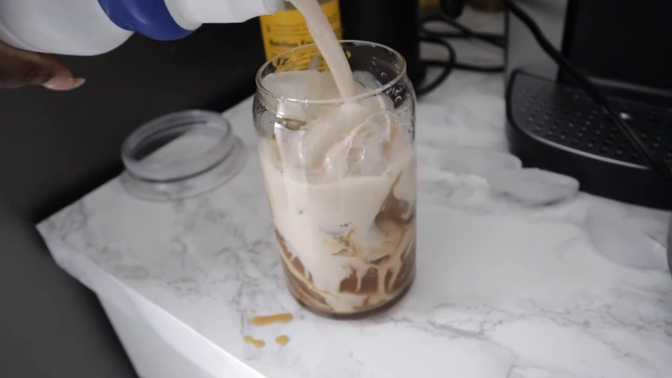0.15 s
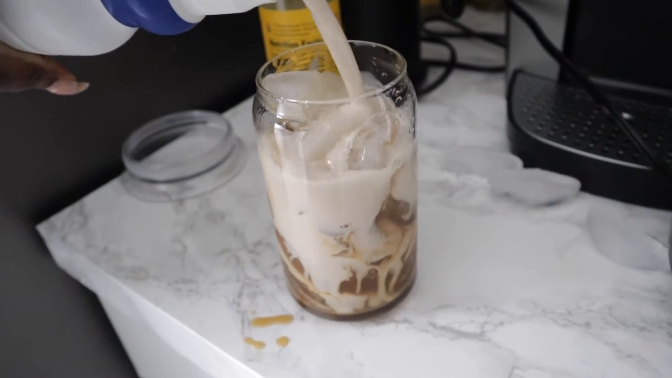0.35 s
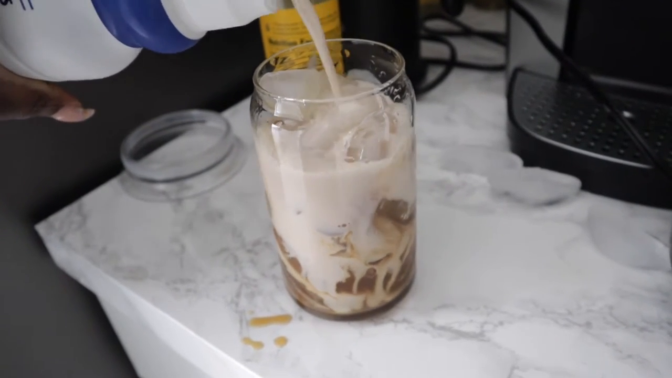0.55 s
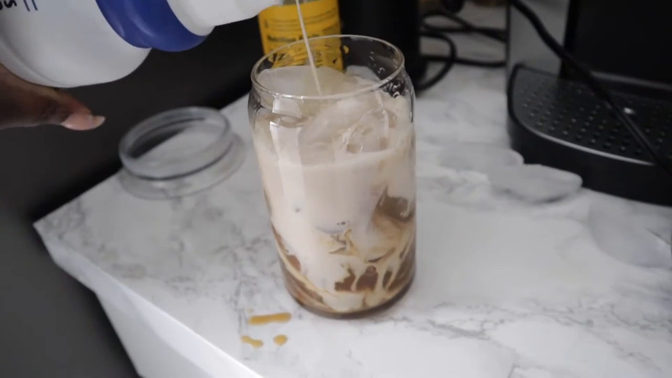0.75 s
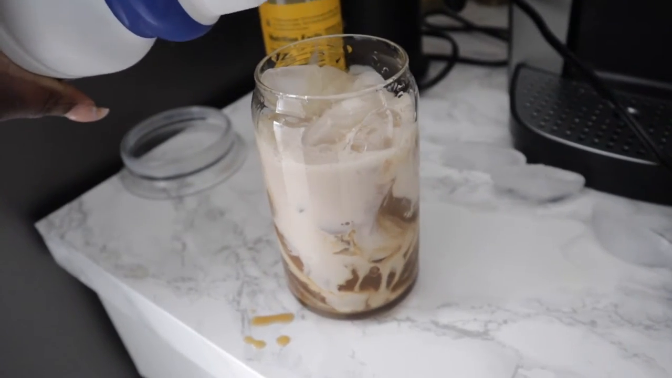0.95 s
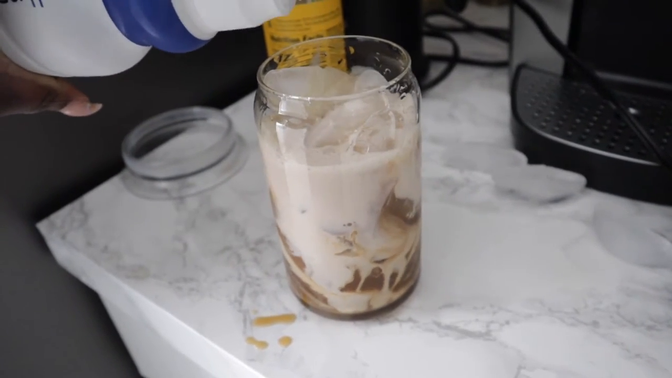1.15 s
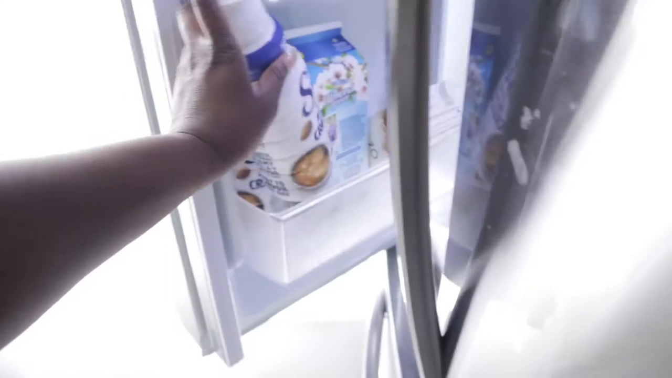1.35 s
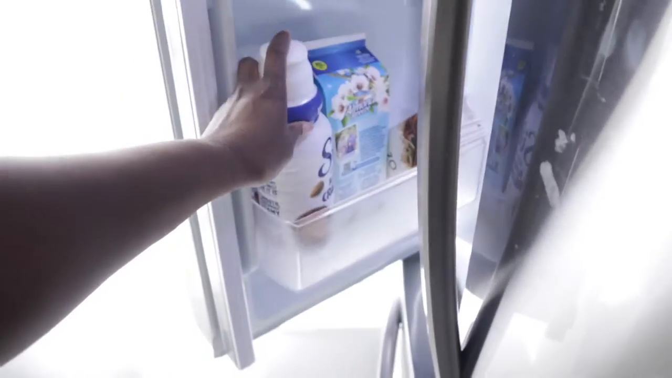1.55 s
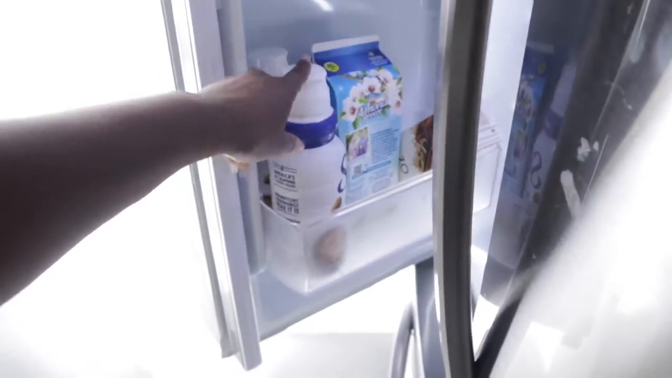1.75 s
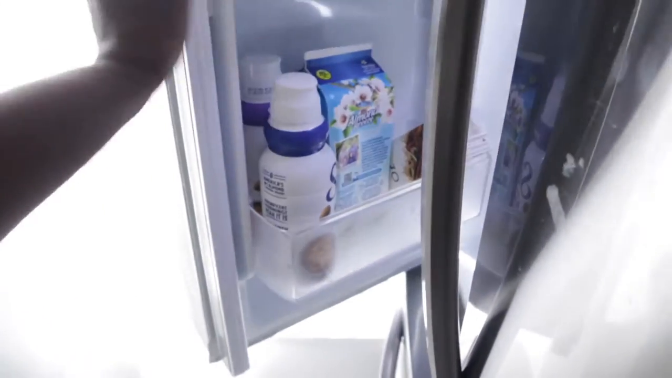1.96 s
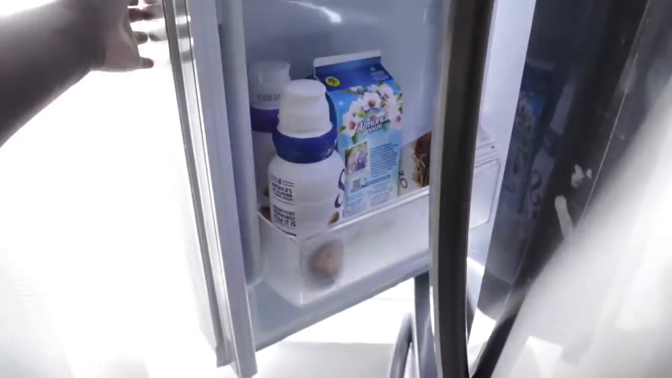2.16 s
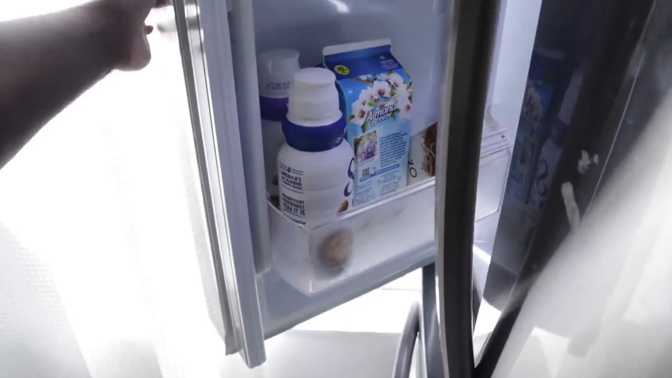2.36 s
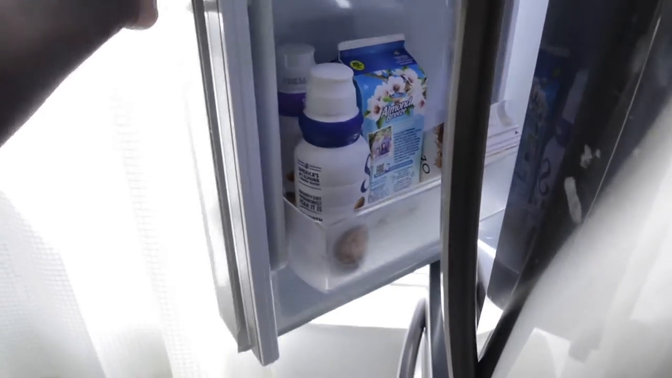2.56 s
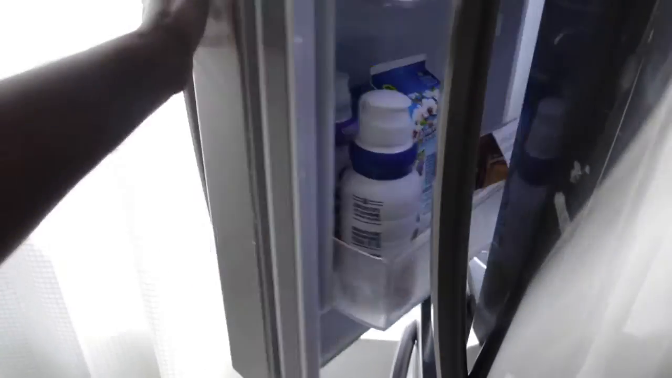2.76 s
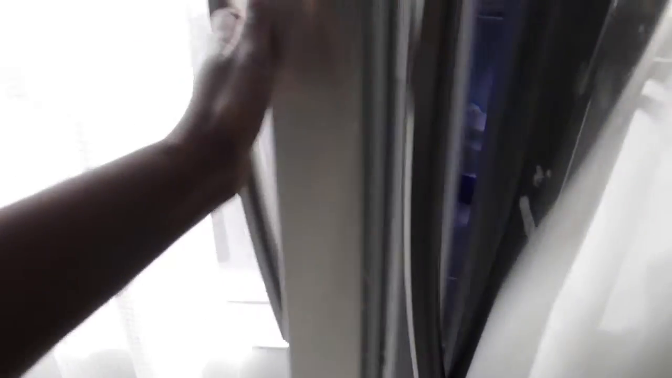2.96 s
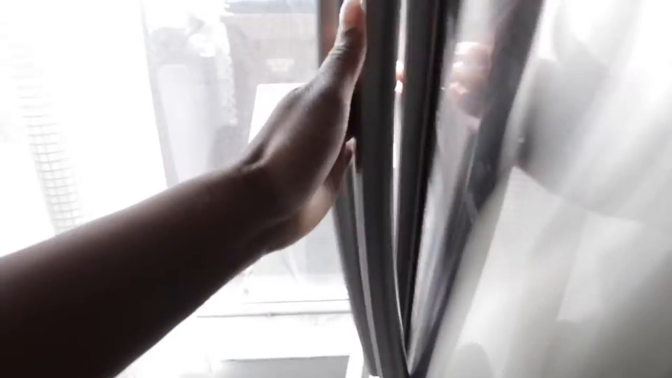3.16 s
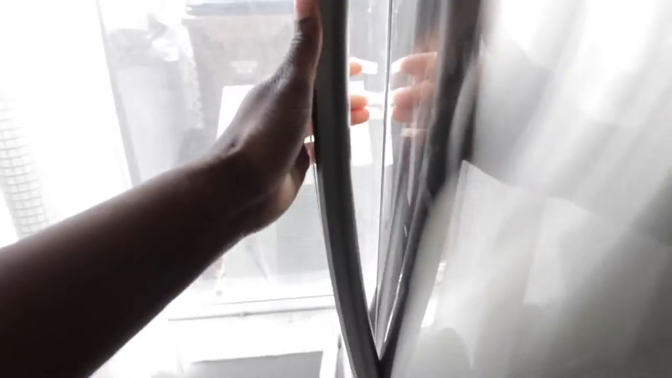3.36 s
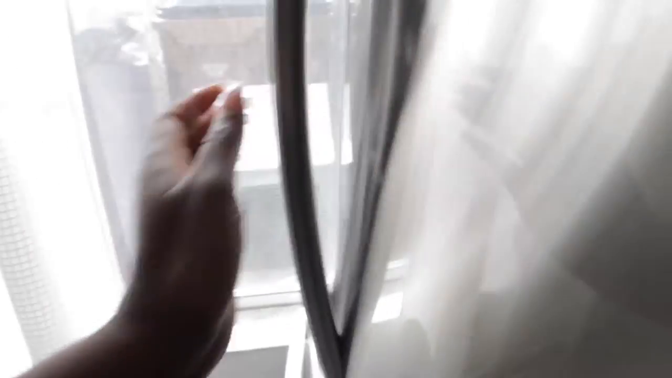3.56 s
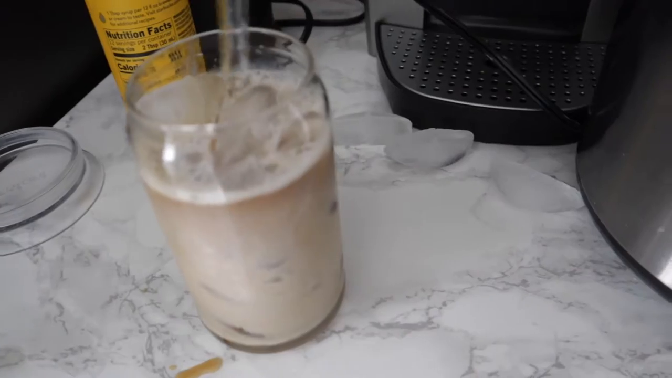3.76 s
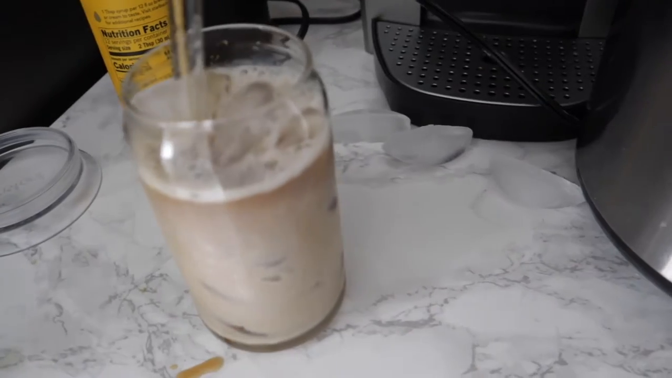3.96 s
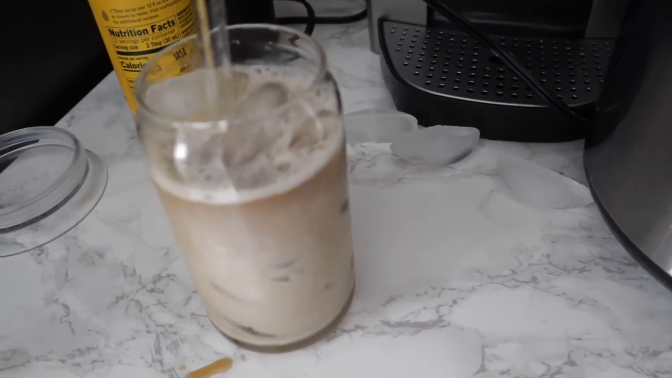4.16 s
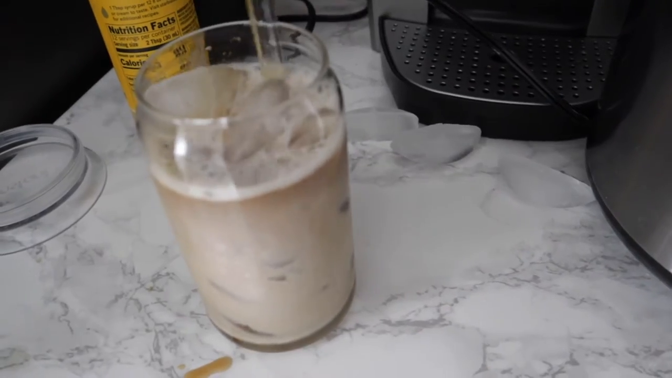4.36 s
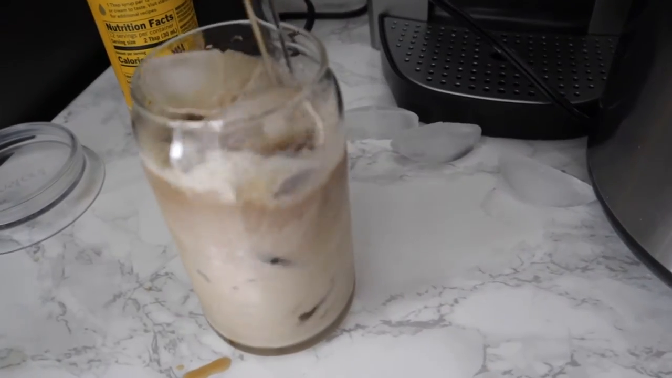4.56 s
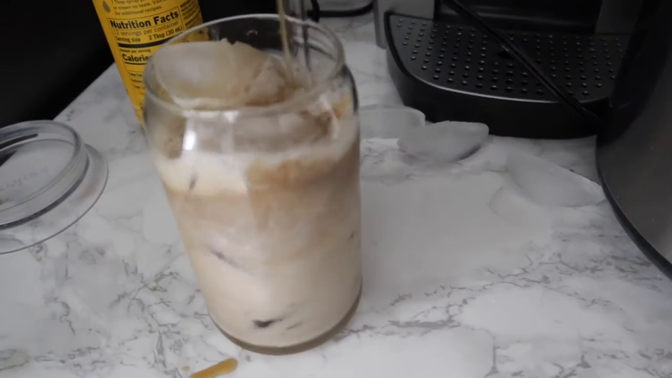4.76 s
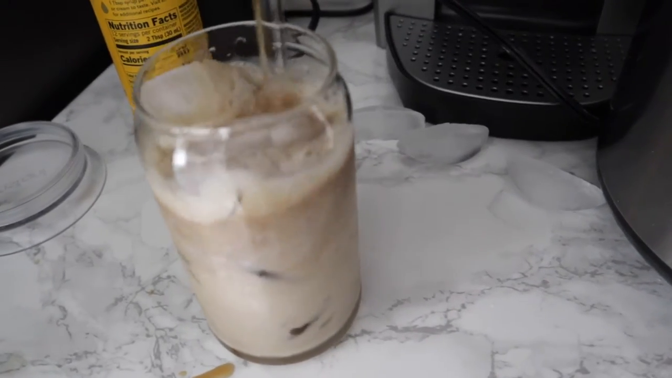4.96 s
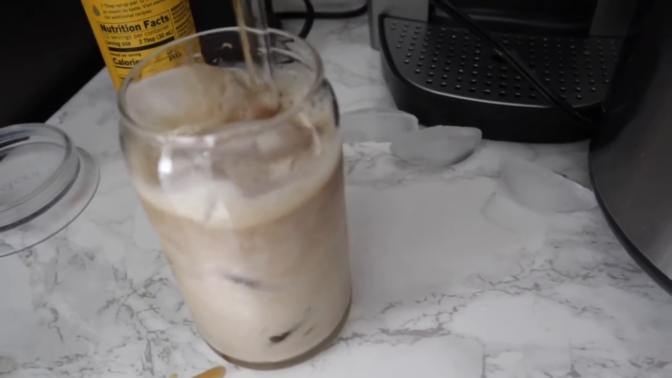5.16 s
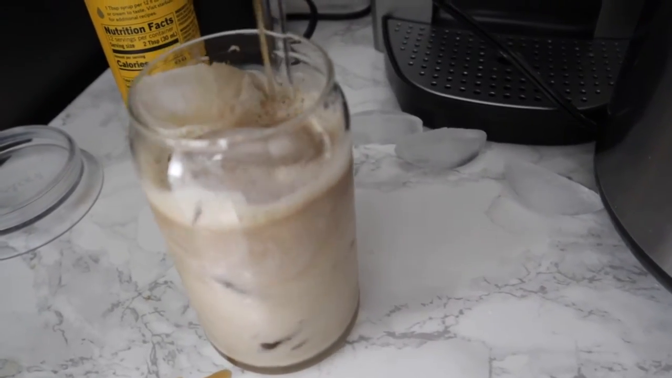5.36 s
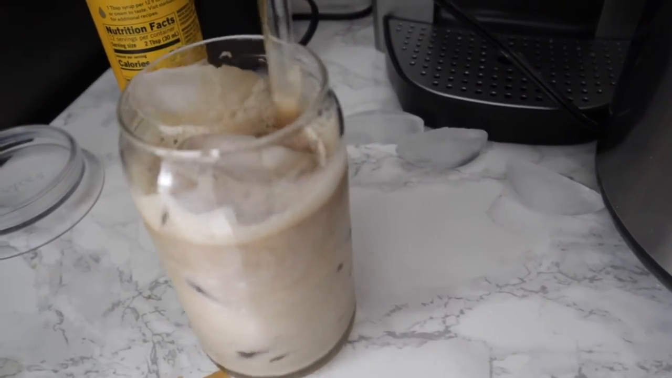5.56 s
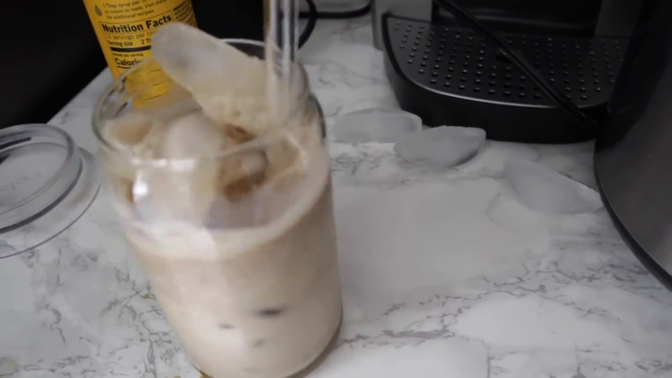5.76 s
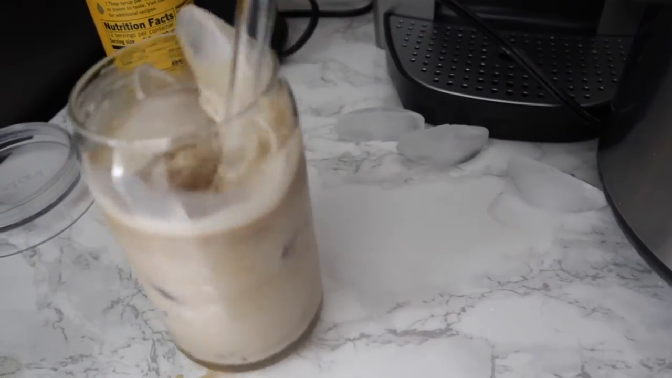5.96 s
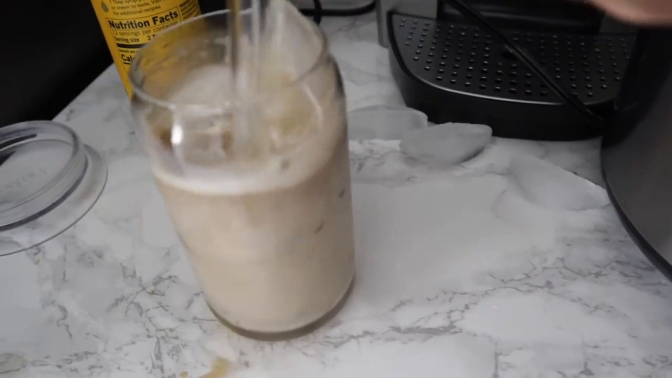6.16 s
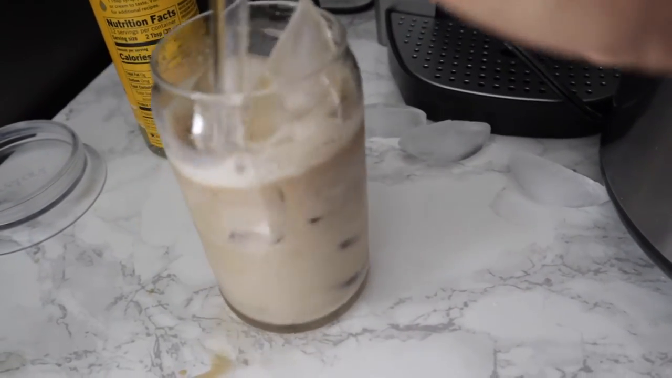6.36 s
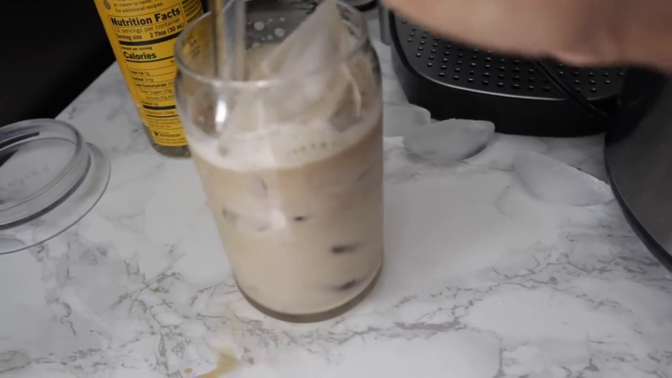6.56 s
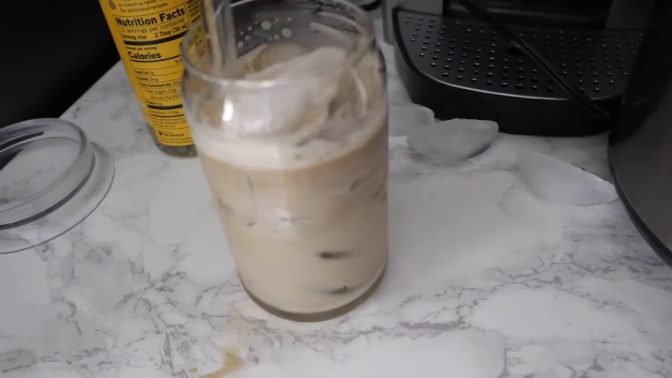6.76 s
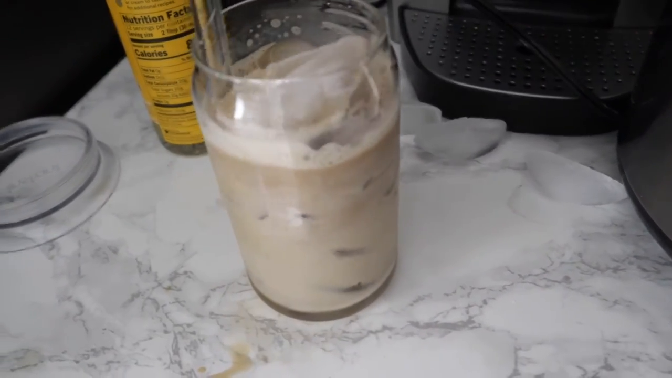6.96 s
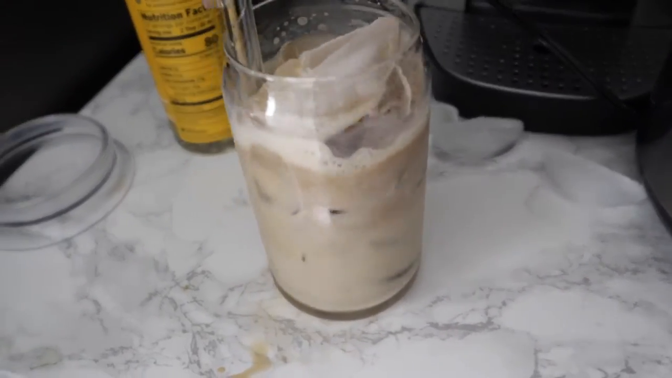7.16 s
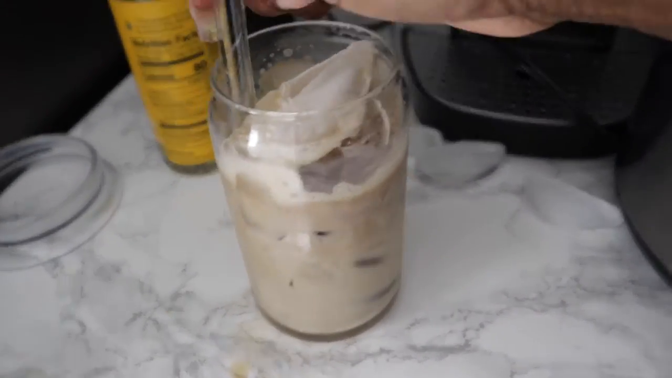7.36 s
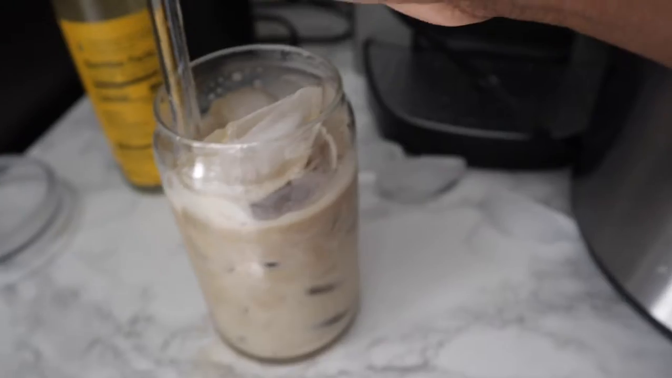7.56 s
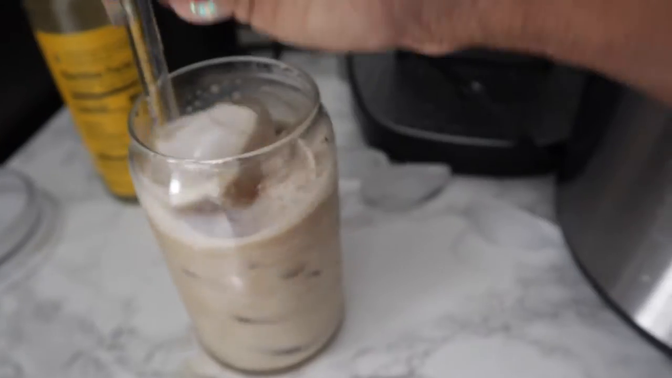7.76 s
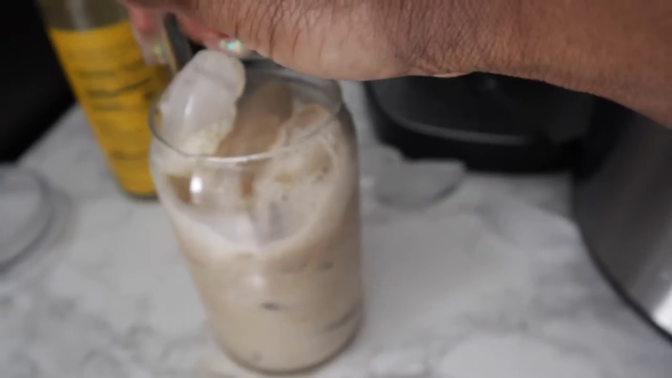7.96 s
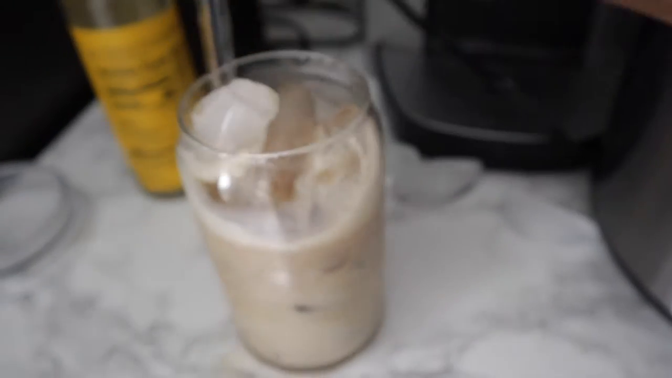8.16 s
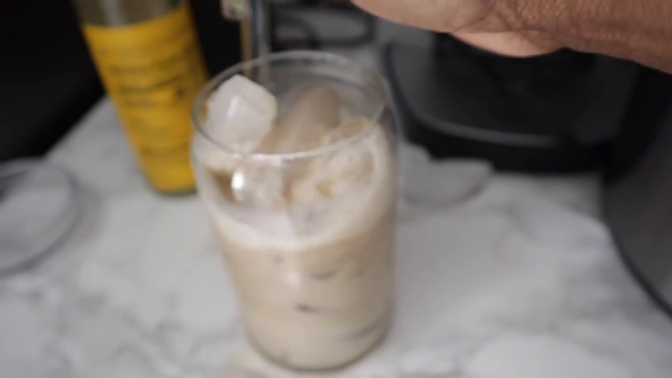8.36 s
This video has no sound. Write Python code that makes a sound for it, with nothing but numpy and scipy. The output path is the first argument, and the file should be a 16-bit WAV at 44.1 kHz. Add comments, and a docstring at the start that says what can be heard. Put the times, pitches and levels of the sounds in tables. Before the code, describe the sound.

In a small kitchen, close to the microphone, creamer crackles faintly over ice with a few ticking drops. A bottle then drops loudly into a fridge door shelf, hollow plastic booming and clacking over a faint motor hum. A snap and the door's heavy, rattling closing thumps follow. Finally a straw stirs iced coffee: wet ice clicks, grainy rubbing, tiny bubble plips and low knocks of the glass jar on the counter.

```python
"""A straw stirs iced coffee in a glass jar: cubes click as short clusters of struck notes plus noise, rub as
grainy noise and drip as rising bubble notes, while the jar knocks on the counter with its low notes.
Before that, creamer runs softly onto ice (crackling noise, ticking drops), and its bottle is dropped into
the fridge door shelf and the door is pushed shut (booms, clacks, cracks, snaps, thuds and shaking).
Air noise, a motor hum and the echo of a small kitchen surround it all."""
import sys
import numpy as np
from scipy import signal
from scipy.io import wavfile

SR = 44100
rng = np.random.default_rng(int(sys.argv[2]) if len(sys.argv) > 2 else 0)


def materialize(psi):
    """Save the field psi as 16-bit PCM at rate SR to the path in sys.argv[1].

    A 1-D psi becomes a single channel; in a 2-D psi each row is a channel.
    """
    bounded = np.clip(np.atleast_2d(psi).T, -1, 1)
    quanta = np.round(bounded * 32767).astype(np.int16)
    wavfile.write(sys.argv[1], SR, quanta)


N = 371322
TIME = np.arange(N) / SR   # seconds from the start
AGE = TIME[:SR // 3]   # seconds since a blow

# In all tables, t60 is the time a sound takes to fade by 60 dB. Levels are relative: gains may follow.

# Kitchen air and appliance hum, one colour for each of three places: f/Hz, level per Hz/dB
AIR_POUR = [(13, -35), (22, -9.5), (133, -4), (170, -14.5), (279, -6), (397, -14), (567, -15.5),
            (1010, -18), (1690, -28), (2160, -29), (5320, -33.5), (5930, -43), (10500, -41), (15000, -48)]
AIR_FRIDGE = [(13, -38), (22, -10), (86, -14), (224, -6.5), (286, -12.5), (356, -15), (431, -4.5),
              (468, -16), (668, -17.5), (1060, -22), (1150, -15), (1400, -25.5), (7380, -38),
              (10500, -40.5), (15000, -86.5)]
AIR_STIR = [(13, -31), (22, 1.5), (286, -2), (408, -11), (582, -9.5), (668, -9.5), (1030, -12.5),
            (1430, -26), (1600, -9.5), (1780, -21.5), (2610, -22.5), (7180, -34), (9960, -46.5),
            (15000, -62)]
AIR_POUR_DB, AIR_FRIDGE_DB, AIR_STIR_DB = -39, -42, -40
# Steady tones of the fridge motor: f/Hz, level/dB
MOTOR = [(226, -62), (366, -51), (425, -59)]
# How alike left and right are (1 same, -1 opposite): f/Hz, nearby sounds/share, kitchen air/share
LIKENESS = [(59.6, .999, 1), (132, 1, 0.99), (296, 1, 0.91), (640, 0.65, 0.39), (1320, 0.46, -0.24),
            (3070, -0.41, -0.49), (7350, -0.093, -1.01), (15500, -0.99, -0.5)]
# Echo of the kitchen: f/Hz, level/dB, t60/s
KITCHEN = [(100.5, -23, 0.87), (367, 9, 0.23), (1500, 7, 0.17), (5130, 0.5, 0.29), (9500, -13, 0.21),
           (14000, 18, 0.13)]
SOFT_TOP_HZ = 12400   # rubbing, shelf rattle, air and echoes are low-passed here
CUTOFF_HZ = 16000   # steep low-pass over the whole mix; almost nothing sounds above this

# Cream running over ice: t/s, level/dB
POUR = [(0.0, -51.5), (0.318, -50.5), (0.416, -44), (0.594, -46), (0.616, -54), (1.332, -54), (1.36, -50)]
# Colour of that crackle: f/Hz, level per Hz/dB
SPLASH = [(350, -42), (600, -15), (741, -7), (1110, -13.5), (1360, -14), (2880, -18.5), (3900, -24.5),
          (9940, -27), (14000, -15)]
# Heavy cream drops on ice: t/s, level/dB, f/Hz
DROPS = [(0.41, -26, 2790), (.447, -32, 2300), (0.563, -28, 2560)]
GLUG_START_S, GLUG_END_S = .39, .6
# Small drops of the glug: number, level of the largest, pitch range
SPRAY_COUNT, SPRAY_DB, SPRAY_LOW_HZ, SPRAY_HIGH_HZ = 70, -38, 1300, 5500

# Bottle, shelf and door blows:
# t/s, boom f/Hz, boom level/dB, clack f/Hz, clack level/dB, crack f/Hz, crack level/dB, treble level/dB
BLOWS = [(1.388, 181, -20, 610, -16.5, 2280, -14, -16), (1.406, 260, -17, 610, -10.5, 1530, -28, -36),
         (1.442, 202, -14, 578, -8, 1270, -25, -26), (1.463, 252, -7, 840, -16, 1260, -27, -26),
         (1.5, 180, -20, 497, -16, 1800, -21, -20), (1.522, 214, -0.5, 596, -2, 1994, -4.5, -8.5),
         (1.552, 170, -8.5, 585, -24, 1840, -15, -21), (1.584, 297, -6.5, 730, 0, 2080, -11.5, -11.5),
         (1.606, 218, -14, 636, -28, 2150, -30, -18), (1.641, 261, -15, 623, -25, 2100, -38, -36),
         (1.763, 163, 0, 695, -5.5, 1650, -9, -15.5), (1.795, 269, 0.5, 665, -2.5, 1580, -2.5, -4),
         (1.808, 271, -4, 700, -14.5, 1800, -13, -19.5), (1.849, 251, -4, 770, -6.5, 1470, -15.5, -15.0),
         (1.898, 220, -6.5, 835, -25, 1900, -29, -37), (1.933, 363.6, -12.5, 450, -27.5, 1320, -39, -25.5),
         (2.281, 363, -40, 800, -45, 2750, -31, -27.5), (2.606, 358, -37, 1107, -40, 1270, -31, -25.5),
         (3.101, 176, -18.5, 720, -17, 1580, -23, -19), (3.117, 243, -32, 740, -21.5, 1440, -19.5, -14),
         (3.203, 227, -14.5, 920, -21, 1590, -5.5, -16.5), (3.2232, 280, -0.5, 900, -5, 2090, -6, -6.5),
         (3.272, 275, -11, 900, -17, 1380, -17, -12), (3.283, 200, 2, 840, -6, 1900, -2.5, -7),
         (3.376, 150, -11, 950, -16, 1480, -21, -45), (3.386, 266, -9, 644, -16, 2300, -16, -19.5),
         (3.4535, 212, -4, 830, -14.5, 1230, -28, -50), (3.529, 198, -19, 750, -23.5, 1280, -43, -55),
         (3.597, 132, -13.5, 740, -28, 1910, -37, -63)]
# Boom, clack and crack ranges: low f/Hz, high f/Hz, gain/dB, rattle against note/dB, t60/s
FRIDGE_BANDS = [(125, 312, 0, -3, 0.06), (510, 1140, 0, 0.5, 0.038), (1253, 2800, 0.5, 3.5, 0.036)]
# Splintery treble of a blow: low f/Hz, high f/Hz, gain/dB, t60/s
SPLINTER_BANDS = [(3330, 5140, -2, 0.059), (5200, 17600, 0.5, 0.085)]
SHARP_DB, SHARP_T60_S = -8.5, 0.01   # first hard touch of a blow: level against its rattle, t60
# Small plastic snaps: t/s, level/dB
SNAPS = [(1.076, -36.5), (2.184, -7), (2.191, -7), (2.198, -6), (2.947, -39.5)]
# Soft heavy thuds of glugging cream, bottle and door: t/s, level/dB, f/Hz, t60/s
THUDS = [(0.48, -20.5, 136, 0.038), (0.531, -20.5, 117, 0.081), (1.621, -22, 59.4, 0.35),
         (1.769, -14, 143, 0.1), (3.059, -27, 45.8, 0.65), (3.177, -16, 55, 0.1), (3.286, -3.5, 63, 0.07),
         (3.353, -15, 42, 0.58), (3.42, -23, 36, .25)]
# Two spans of shelf contents shaking and the gasket rubbing: t/s, rumble level/dB, rattle level/dB
SHAKE = [
    [(1.36, -49, -73), (1.418, -34, -23.5), (1.592, -9.5, -23), (1.734, -33, -35), (1.772, -24, -21.5),
     (1.952, -23, -29.5), (2.1, -48, -52.5)],
    [(3.04, -34, -48), (3.126, -25.5, -27), (3.294, -16.5, -34.5), (3.326, -22.5, -22), (3.478, -13.5, -32),
     (3.64, -32, -47), (3.72, -41, -48)],
]
# Colours of that rumble and rattle: f/Hz, level per Hz/dB
RUMBLE = [(15, -30.5), (25, -16), (49, -4), (97, -4), (161, 0), (270, -2.5), (305, 18.5), (397, -19.5),
          (466, -36.5), (600, -42), (780, -65), (1320, -120)]
RATTLE = [(260, -26), (450, 5.5), (603, -13), (897, 1), (1100, -14), (1200, -11), (2430, -15),
          (4710, -28.5), (6990, -27.5), (8850, -30.5), (10900, -14), (15000, -45.5)]
# Notes of the plastic shelf, one for each small tap: f/Hz
SHELF_MODES_HZ = [595, 755, 1067, 1248, 1562, 2022]
# Cartons tapping in the shelf: taps per second, level against the rattle, length of a tap in cycles
CHATTER_PER_S, CHATTER_DB, CHATTER_CYCLES = 240, -7.5, 9

# The straw rocks the jar on the counter: t/s, low level/dB, middle level/dB, high level/dB
KNOCKS = [(3.975, -17, -21, -18.5), (4.566, -17.5, -23.5, -28), (4.596, -18, -20.5, -21),
          (4.648, -27, -40, -42), (4.7, -23, -41, -49), (4.782, -24, -30, -41), (4.984, -20, -12, -21),
          (4.993, -28, -19, -25), (5.255, -17.5, -25, -17), (5.437, -27, -29, -37),
          (5.649, -19.5, -31, -44), (5.683, -26, -26, -32), (5.72, -28, -27, -29), (6.058, -24.5, -33, -42),
          (6.088, -28.5, -23.5, -22.5), (6.166, -22.5, -26.5, -33), (6.37, -21, -19, -28),
          (6.399, -22, -21, -28), (6.468, -26, -30, -40), (6.553, -30, -16.5, -24), (6.893, -32, -32, -36),
          (7.002, -19, -21, -29), (7.036, -19.5, -20, -27.5), (7.164, -23, -24, -29),
          (7.2, -11, -13.5, -17), (7.213, -12, -18.5, -25), (7.282, -21, -26, -26), (7.55, -55, -20, -30),
          (7.78, -34, -26, -22.5), (7.833, -25, -18, -20.5), (7.848, -22, -22, -17), (7.984, -29, -35, -37)]
# Where those low, middle and high levels apply: f/Hz
KNOCK_HZ = [117, 370, 800]
# Notes of a knock on the counter: f/Hz, level/dB, t60/s
COUNTER = [(106.2, -2.5, 0.26), (136.2, -5.5, 0.29), (197.6, -5, 0.072), (272, 1, 0.047),
           (323.3, -2, 0.087), (374, -4, 0.082), (457, -6, 0.08), (584.6, -11.5, 0.065), (796, -6.5, 0.022),
           (1010, -7, 0.024)]
# The jar touches again after each knock: times, within how long, level against the knock
REBOUND_COUNT, REBOUND_S, REBOUND_DB = 2, 0.033, -10
# Every ice contact also jolts the jar; low, middle and high against the contact's low note: level/dB
ICE_PUSH_DB = [-18, -14.5, -13]

# Air pockets bursting under the moving cubes: t/s, level/dB, f/Hz
BUBBLES = [(4.612, -20, 1790), (4.809, -21, 2150), (5.691, -22, 1750), (5.739, -14.5, 1720),
           (5.774, -26, 1690), (5.847, -33, 1810), (6.04, -32, 1800), (6.183, -17, 1660),
           (6.675, -32, 1900), (7.605, -20.5, 1850), (7.676, -23.5, 1240), (7.979, -24.5, 1240),
           (8.001, -26, 1500), (8.007, -24, 1250), (8.103, -27, 1450), (8.121, -28, 1480),
           (8.271, -26, 1250)]
# Life of a bubble in cycles (to -60 dB), pitch rise as a share per second, time constant of its onset
BUBBLE_CYCLES, BUBBLE_RISE_PER_S, BUBBLE_SWELL_S = 26, 9, 0.0003
BUBBLE_NOTE_DB = -2   # the note against the listed level
# Longer slides of the straw: start t/s, end t/s, level/dB
SLIDES = [(4.15, 4.242, -48), (4.366, 4.52, -43), (4.52, 4.69, -42.5), (4.69, 4.8, -37.5),
          (5.678, 5.81, -41.5), (6.036, 6.223, -49.5), (6.283, 6.5, -43.5), (6.91, 6.977, -38),
          (7.14, 7.193, -43), (7.78, 7.898, -40), (8.358, 8.403, -30.5)]
# Colour of the rubbing ice: f/Hz, level per Hz/dB
RUB = [(530, -42), (900, -12), (1000, 0.5), (1450, -16.5), (1770, -4.5), (2930, -10), (3340, -13),
       (5630, -13.5), (9510, -16.5), (10200, 2.5), (15500, -26.5)]
STIR_START_S = 3.75
RUB_REST_DB = -56   # the straw resting against the ice
GLIDE_DB, GLIDE_S = -33.5, 0.0097   # cubes glide on: level against the contact, time constant

# Ice contacts with three short notes each:
# t/s, low f/Hz, low level/dB, middle f/Hz, middle level/dB, high f/Hz, high level/dB
ICE = [(3.9239, 2820, -4, 4250, -24, 10300, -8.5), (3.943, 2100, -17, 4600, -6.5, 7840, -8),
       (3.9755, 1810, -6.5, 5200, -19, 10700, -16.5), (4.3547, 1890, -15.0, 3230, -25, 6560, -33),
       (4.386, 2930, -12.5, 6240, -14, 10270, -0.5), (4.483, 1950, -12, 3900, -11, 6560, -21),
       (4.5073, 1700, -30, 4870, -18, 10450, -12.5), (4.5194, 1900, -15.0, 4700, -17, 10630.0, -20),
       (4.56, 3000, -23, 4670, -21, 9800, -19.5), (4.5655, 1920, -16, 4070, -9.5, 10560.0, -16.5),
       (4.574, 2500, -25, 4460, -21.5, 10100, -17.5), (4.711, 1770, -14.5, 3200, -19.5, 10070.0, -26),
       (4.723, 1980, -26, 6260.0, -18.5, 6800, -38), (4.751, 2060.0, -14.5, 4270.0, -26, 6580.0, -38),
       (4.7561, 2850.0, -15, 3900, -18, 9700, -17.5), (4.7709, 2850, -8.5, 5000, -11, 10900, -4.5),
       (4.7805, 2140, -9, 5640, -18, 6300, -21), (4.7886, 2000, -13.5, 4370, -23, 9100, -21),
       (4.985, 2130, -21, 3960.0, -30, 7620.0, -39), (4.9928, 1940, -18, 4760, -27, 8430.0, -33),
       (5.01, 2600, -11, 3630, -14.5, 9800, -20), (5.052, 2300, -23, 3210.0, -34, 8430.0, -35),
       (5.0605, 3200, -20.5, 4700, -25, 10000, -22), (5.2037, 2400, -18, 3960, -23.5, 10230, -34),
       (5.2259, 1990, -20.5, 3550, -24, 9800, -25), (5.252, 2160, -9, 3970, -10.5, 9400, -6),
       (5.283, 2650, -16, 4200, -18, 6800.0, -37), (5.3178, 1950.0, -34, 5320.0, -37, 8540, -18),
       (5.4353, 1690, -31.5, 3400, -29.5, 6310.0, -53), (5.5025, 3120.0, -36, 4050, -34, 10500, -25),
       (5.5119, 2330, -18, 3880, -18, 10400, -19), (5.545, 1720, -20.5, 5930, -12, 6350, -19),
       (5.6462, 2040, -16, 4940, -13.5, 9780, -11.5), (5.7938, 1760, -20, 3250.0, -42, 9700, -36),
       (6.0592, 1770, -25, 4500, -40, 10500, -36), (6.0874, 1970, -14.5, 4100, -29, 10600, -21.5),
       (6.3661, 1840, -18.5, 5260, -13.5, 8900, -12.5), (6.4412, 1880, -28.5, 3560, -25.5, 8900, -27.5),
       (6.4966, 1760, -24.5, 4530, -30, 8700, -30.5), (6.5517, 2260, -9, 4450, -6, 7400, -6.5),
       (6.7729, 3100, -18.5, 3240, -20.5, 6460, -27.5), (6.781, 2280, -21.5, 3300, -23.5, 7000, -38),
       (6.7921, 2540, -24, 3240.0, -17, 6910.0, -50), (6.808, 2200.0, -24, 3940.0, -34, 9720.0, -29),
       (6.8956, 2430, -24.5, 3950, -35, 10370.0, -43), (6.96, 2040, -12.5, 4300, -13.5, 8800, -12.5),
       (6.972, 2000, -28, 4200, -23, 8700, -27), (7.0008, 2600, -11.5, 4340, -5.5, 8930, -5),
       (7.0282, 2220, -18.5, 4790.0, -25, 6600, -28), (7.156, 2590.0, -35, 4590.0, -29, 6850, -29),
       (7.1974, 2880, -9, 4300, -17, 9500, -15), (7.2057, 1740, -12, 3780, -17, 8200, -19),
       (7.2143, 1540, -13.5, 4150, -17.5, 6600, -18), (7.2216, 2880, -14, 4900, -14, 8800, -11),
       (7.5497, 2050, -15, 3980, -10, 9100, -8.5), (7.6863, 2230, -23, 4400, -16.5, 9500, -23),
       (7.7094, 2100, -16, 4270, -9, 9900, -11), (7.7723, 1920.0, -15.5, 3940, -13.5, 8860.0, -25),
       (7.777, 2260, -13, 4900, -8.5, 7700, -13.5), (7.782, 2200, -21, 4300, -17, 8500, -24),
       (7.8242, 2920, -18.5, 4210.0, -17, 9500, -22), (7.8309, 2900, -15, 4230, -14.5, 10600, -16),
       (7.8476, 2850, -14, 3660, -30, 6520.0, -27.5), (7.857, 1700, -16.5, 4920.0, -20.5, 6800.0, -27),
       (7.9947, 1530, -31, 3500, -28.5, 8600, -30), (8.004, 2620, -28, 4230, -34, 8500, -37),
       (8.118, 2600, -22.5, 3700, -23, 6100, -28.5), (8.1465, 1640, -29, 3630.0, -38, 9590.0, -43),
       (8.1969, 1620, -28.5, 3740, -32.5, 10000, -38), (8.206, 1850, -26.5, 3670, -29, 10000, -46),
       (8.2647, 1860, -28, 3840, -38, 9960.0, -44), (8.3557, 2000, -28, 3770.0, -42, 9640.0, -39),
       (8.3651, 2590, -7, 4180, -3, 10040, -6)]
# Low, middle and high range of a cube:
# low f/Hz, high f/Hz, gain/dB, click against note/dB, note t60/s, spread of its modes/share of pitch
ICE_BANDS = [(1200, 3200, 0, 0, 0.007, 0.16), (3170, 5900, -1.5, 1.5, 0.004, 0.13),
             (6250, 14500, 3, 4, 0.0082, 0.043)]
# Glass wall, damped by the drink: f/Hz, level/dB, t60/s
JAR = [(5110, -22, 0.039), (9560, -33, 0.035)]
# Cubes knocked free that ring on: t/s, level/dB, f/Hz, t60/s
FREE_CUBES = [(4.781, -29, 2400, .11), (6.7925, -20, 3260, .03), (6.96, -24, 2020, .035),
              (7.029, -26, 2330, .06), (7.825, -27, 1766, 0.088), (7.848, -24, 2912, .045)]
CLICK_RISE = 0.29   # dB of click per dB of high note over low note: wet, dull contacts mostly ring
# Slip time at the usual strength, that strength, and dB of extra slip per dB of softness
SLIDE_S, SLIDE_USUAL_DB, SOFT_SLIDE = .003, -15, .6
NEIGHBOUR_COUNT, NEIGHBOUR_DB = 4, -6   # close modes beside each note, their level against it


def from_db(db):
    """Turn decibels into a plain gain."""
    return 10 ** (np.asarray(db) / 20)


def rms_one(x):
    """Scale a sound to an average strength (RMS) of one."""
    return x / np.sqrt(np.mean(x ** 2) + 1e-20)


def at_hz(points, hz, axis=1):
    """Read a table column at a pitch, drawing straight lines over log frequency."""
    points = np.array(points)
    return np.interp(np.log(hz), np.log(points[:, 0]), points[:, axis])


def gate(start, end):
    """One between two times, with short fades."""
    return np.clip(np.minimum(TIME - start, end - TIME) / 0.0087 + .5, 0, 1)


def level(rows, axis=1):
    """A dB column as a gain in time, silent outside its span."""
    rows = np.array(rows)
    gain = from_db(np.interp(TIME, rows[:, 0], rows[:, axis]))
    return gain * gate(rows[0, 0], rows[-1, 0])


def band(x, low, high, order=2):
    """Keep mainly the pitches between low and high."""
    sos = signal.butter(order, [low, min(high, .48 * SR)], "band", fs=SR, output="sos")
    return signal.sosfilt(sos, x)


def soften(x):
    """Low-pass a sound steeply at SOFT_TOP_HZ."""
    sos = signal.butter(12, min(SOFT_TOP_HZ, .45 * SR), fs=SR, output="sos")
    return signal.sosfilt(sos, x + 1e-18)


def add(out, s, sound):
    """Mix a sound in at a time."""
    i = int(s * SR)
    out[:, i:i + sound.shape[-1]] += sound[..., :N - i]


def widen(pair, hz, axis=1):
    """Two unrelated signals become left and right: alike in the bass, opposed in the treble."""
    alike = np.clip(at_hz(LIKENESS, hz, axis), -1, 1)
    middle = np.sqrt(1 + alike) * pair[0]
    side = np.sqrt(1 - alike) * pair[1]
    return middle + side * np.array([[1], [-1]])


def from_left(x, corner_hz):
    """A source left of centre: the right channel lags, up to half a cycle in the treble."""
    k = np.tan(np.pi * corner_hz / SR)
    c = (k - 1) / (k + 1)
    return np.array([x, signal.lfilter([c, 1], [1, c], x + 1e-18)])


def split(draw, axis=1):
    """Half-octave stereo bands (Hz, signal); neighbours come from unrelated draws."""
    edges = 20 * 2 ** (np.arange(21) / 2)
    pairs = draw(), draw()
    for k, (low, high) in enumerate(zip(edges, edges[1:])):
        hz = np.sqrt(low * high)
        yield hz, widen(band(pairs[k % 2], low, high), hz, axis)


def grains(size, grain_db):
    """A gain that jumps about every millisecond, as surfaces catch and slip."""
    jumps = np.clip(rng.standard_normal(size // 50 + 1), -2.5, 2.5)
    return from_db(grain_db * np.repeat(jumps, 50)[:size])


def texture(spectrum, start, end, grain_db, axis=1):
    """Coloured, grainy noise over a span; axis picks its column of LIKENESS."""
    size, out = int((end - start) * SR), np.zeros((2, N))
    uneven = grains(size, grain_db)
    bands = split(lambda: uneven * rng.standard_normal((2, size)), axis)
    lowest, highest = spectrum[0][0], spectrum[-1][0]
    coloured = sum(from_db(at_hz(spectrum, hz)) * x for hz, x in bands if lowest <= hz <= highest)
    add(out, start, rms_one(coloured))
    return soften(out)


def ring(hz, t60):
    """One struck mode: a sine that dies away, stopped after twice its t60."""
    out, age = np.zeros(len(AGE)), AGE[AGE < 2 * t60]
    out[:len(age)] = np.sin(2 * np.pi * hz * age) * np.exp(-np.log(1000) * age / t60)
    return out


def crack(low, high, t60, grain_db=0):
    """A crowd of heavily damped modes, made as fading band noise; grain_db makes it rattle."""
    fade = from_db(-60 * AGE[:SR // 6] / t60)
    noise = rng.standard_normal((2, len(fade))) * (fade + 1e-9)
    pair = band(noise * grains(len(fade), grain_db), low, high)
    # Shorter fades carry less energy, whatever the bandwidth
    pair = pair * np.sqrt(np.sum(fade ** 2) / np.sum(pair ** 2, axis=1, keepdims=True))
    return widen(pair, np.sqrt(low * high)) / 2


def unit_hit(x):
    """Scale a hit to the energy of one millisecond at full level."""
    return x / np.sqrt(np.mean(np.sum(x ** 2, axis=-1)) * 1000 / SR)


def shares(ratio_db):
    """Gains of a first sound and a second one, ratio_db against it, that together keep the energy."""
    return np.array([1, from_db(ratio_db)]) / np.hypot(1, from_db(ratio_db))


def note(hz, t60, slide_s, slip_db, detune, count=4, attack_share=0.12):
    """An uneven body rings a cluster of close modes, then slips and touches again at other pitches."""
    out = ring(hz, t60)
    for pitch, size in rng.standard_normal((NEIGHBOUR_COUNT, 2)):
        out = out + from_db(NEIGHBOUR_DB) * size * ring(hz * np.exp(detune * pitch), t60)
    moments, pitches = rng.random(count), rng.standard_normal(count)
    sizes = rng.uniform(-0.98, 1, count)
    for when, pitch, size in zip(moments, pitches, sizes):
        slip = from_db(slip_db) * size * ring(hz * np.exp(detune / 2 * pitch), t60)
        out = out + np.pad(slip, (int(when * slide_s * SR), 0))[:len(AGE)]
    attack = 1 - np.exp(-AGE / (attack_share * slide_s))
    return unit_hit(out[None] * attack)


def clatter(low, high, t60):
    """A hard first touch with the duller, uneven rattle of loose plastic."""
    rattle, touch = shares(SHARP_DB)
    dull = unit_hit(soften(crack(low, high, t60, grain_db=2.5)))
    return rattle * dull + touch * unit_hit(crack(low, high, SHARP_T60_S))


def air():
    """Steady kitchen air as coloured noise, with the motor's sines heard beside the fridge."""
    places = [(AIR_POUR, AIR_POUR_DB, -.1, 1.39),
              (AIR_FRIDGE, AIR_FRIDGE_DB, 1.39, 3.68),
              (AIR_STIR, AIR_STIR_DB, 3.68, 8.6)]   # colour, level/dB, start t/s, end t/s
    hiss = 0
    for colour, db, start, end in places:
        noise = texture(colour, max(start - .1, 0), end + 0.092, grain_db=-2.0, axis=2)
        hiss = hiss + from_db(db) * gate(start, end) * noise
    motor = sum(from_db(db) * np.sqrt(2) * np.sin(2 * np.pi * hz * TIME) for hz, db in MOTOR)
    return hiss + gate(1.39, 3.68) * motor


def kitchen(x, build_s=0.0015):
    """Diffuse reflections build up in a few milliseconds and die band by band."""
    t = TIME[:SR // 2]
    tail = 0
    for hz, noise in split(lambda: rng.standard_normal((2, len(t)))):
        tail = tail + noise * from_db(at_hz(KITCHEN, hz) - 60 * t / at_hz(KITCHEN, hz, axis=2))
    tail = rms_one(soften(tail) * (1 - np.exp(-t / build_s))) / np.sqrt(len(t))
    return signal.fftconvolve(x[:1], tail, axes=1)[:, :N]   # the left channel feeds both sides


def shelf(rumble_db=-7, rattle_db=-3.3):
    """Cartons and bottles go on shaking while the door moves: two noises that swell and fade."""
    out = 0
    for rows in SHAKE:
        span = rows[0][0], rows[-1][0]
        rumble = texture(RUMBLE, *span, grain_db=2.5)
        rattle = texture(RATTLE, *span, grain_db=3.5)
        out = out + from_db(rumble_db) * level(rows) * rumble
        out = out + from_db(rattle_db) * level(rows, axis=2) * rattle
    return out


def chatter():
    """Hollow little knocks inside the shelf's rattle, each swelling over one cycle and soon dead."""
    out = np.zeros((1, N))
    for rows in SHAKE:
        start, end = rows[0][0], rows[-1][0]
        for when, size, pitch in rng.random((int(CHATTER_PER_S * (end - start)), 3)):
            hz = SHELF_MODES_HZ[int(pitch * len(SHELF_MODES_HZ))]
            tap = ring(hz, CHATTER_CYCLES / hz) * (1 - np.exp(-AGE * hz))
            add(out, start + when * (end - start), 10 * size ** 3 * tap)   # most taps are weak
    return from_db(CHATTER_DB) * sum(level(rows, axis=2) for rows in SHAKE) * out


def thuds():
    """Soft contacts move only one low mode."""
    out = np.zeros((2, N))
    for s, db, hz, t60 in THUDS:
        add(out, s, from_db(db) * ring(hz, t60))
    return out


def snaps(t60=0.017, body_db=-9, body_t60=0.025):
    """Very short bright snaps of hard plastic: treble noise over a weaker body."""
    out = np.zeros((2, N))
    for s, db in SNAPS:
        bright = crack(5500, 11500, t60)
        body = crack(1300, 5000, body_t60)
        add(out, s, from_db(db) * (bright + from_db(body_db) * body))
    return out


def fridge_blows(right_db=1.5):
    """Bottle, cartons, shelf and door: each blow has a boom, clack and crack under splintery treble."""
    out = np.zeros((2, N))
    for s, *columns, treble_db in BLOWS:
        pitches, levels = columns[::2], columns[1::2]
        for hz, db, (low, high, gain_db, rattle_db, t60) in zip(pitches, levels, FRIDGE_BANDS):
            tone, rattle = from_db(db + gain_db) * shares(rattle_db)
            add(out, s, tone * note(hz, t60, slide_s=0.00604, slip_db=-7.5, detune=0.13))
            add(out, s, rattle * clatter(low, high, t60))
        for low, high, gain_db, t60 in SPLINTER_BANDS:
            add(out, s, from_db(treble_db + gain_db) * clatter(low, high, t60))
    # Above the bass, the right side gains strength and the left loses it
    lean = (from_db(right_db) - 1) * band(out, 450, 14660, order=1)
    return out + lean * np.array([[-1], [1]])


def drops(t60=0.008):
    """Drops tick on the ice as the cream glugs out, in a spray of smaller ones."""
    out = np.zeros((2, N))
    spray = []
    for when, size, pitch in rng.random((SPRAY_COUNT, 3)):
        s = GLUG_START_S + when * (GLUG_END_S - GLUG_START_S)
        hz = SPRAY_LOW_HZ * (SPRAY_HIGH_HZ / SPRAY_LOW_HZ) ** pitch
        spray.append((s, SPRAY_DB - 10 * size, hz))
    for s, db, hz in DROPS + spray:
        add(out, s, from_db(db) * crack(hz * .85, hz * 1.15, t60))
    return out


def pour(pour_db=0):
    """Fine wet crackle of cream running over ice, made as grainy noise."""
    return from_db(pour_db) * level(POUR) * texture(SPLASH, 0, POUR[-1][0], grain_db=4.0)


def knocks(detune=0.035, scatter_db=2.5):
    """The jar rocks on the counter; the shifting load moves the modes a little from knock to knock."""
    out = np.zeros((2, N))
    rebounds = []
    for s, *levels in KNOCKS:
        for when in rng.random(REBOUND_COUNT):
            rebounds.append((s + when * REBOUND_S, *np.add(levels, REBOUND_DB)))
    jolts = [(s, *np.add(ICE_PUSH_DB, low_db)) for s, _, low_db, *_ in ICE]
    for s, *levels in KNOCKS + rebounds + jolts:
        for k, (hz, db, t60) in enumerate(COUNTER):
            strength_db = np.interp(np.log(hz), np.log(KNOCK_HZ), levels) + rng.normal(0, scatter_db)
            mode = ring(hz * (1 + rng.normal(0, detune)), t60)
            add(out, s, (-1) ** k * from_db(strength_db + db) * mode)   # every other mode is inverted
    return out


def bubbles(pop_db=-10, pop_t60=.03, grain_db=6):
    """Each bubble opens with a short wet crackle and rings briefly, rising in pitch."""
    out = np.zeros((2, N))
    for s, db, hz in BUBBLES:
        phase = 2 * np.pi * hz * (AGE + BUBBLE_RISE_PER_S * AGE ** 2 / 2)
        swell = 1 - np.exp(-AGE / BUBBLE_SWELL_S)
        life = swell * from_db(-60 * AGE * hz / BUBBLE_CYCLES)
        add(out, s, from_db(db + BUBBLE_NOTE_DB) * life * np.sin(phase))
        add(out, s, from_db(db + pop_db) * crack(hz * .85, hz * 1.8, pop_t60, grain_db))
    return out


def pressure():
    """How hard the ice rubs: a light steady touch, straw slides and a dying glide after each contact."""
    glides = np.zeros((1, N))
    for s, *columns in ICE:
        loudest_db = max(columns[1::2])
        add(glides, s, from_db(loudest_db + GLIDE_DB) * np.exp(-AGE / GLIDE_S))
    slides = sum(from_db(db) * gate(start, end) for start, end, db in SLIDES)
    return np.sqrt(from_db(RUB_REST_DB) ** 2 + slides ** 2 + glides[0] ** 2)


def rubbing():
    """Ice sliding along the straw: grainy noise that follows the pressure."""
    return pressure() * texture(RUB, STIR_START_S, TIME[-1], grain_db=4.5)


def free_cubes():
    """A loose cube holds one clear note after its contact."""
    out = np.zeros((1, N))
    for s, db, hz, t60 in FREE_CUBES:
        add(out, s, from_db(db) * ring(hz, t60))
    return from_left(out[0], corner_hz=5000)


def ice(dry_t60=0.016, click_t60=0.029, scatter_t60=0.028, direct_db=-2, spread_db=-5, scatter_db=-15,
        left_db=0.45, glass_scatter_db=1.0):
    """Each contact rings three notes of the cube, with a dry click, a rattle in the jar and some glass."""
    direct, spread = np.zeros((1, N)), np.zeros((2, N))
    for s, *columns in ICE:
        pitches, levels = columns[::2], columns[1::2]
        # Softer contacts slip for longer, and their slips stand out more
        softness_db = SOFT_SLIDE * (SLIDE_USUAL_DB - max(levels))
        slide_s = SLIDE_S * from_db(softness_db)
        brightness_db = levels[2] - levels[0]
        for hz, db, (low, high, gain_db, click_db, t60, detune) in zip(pitches, levels, ICE_BANDS):
            force = from_db(db + gain_db)
            tone, click = force * shares(click_db + CLICK_RISE * brightness_db)
            add(direct, s, tone * note(hz, t60, slide_s, slip_db=-1 + softness_db, detune=detune))
            add(direct, s, click * from_db(direct_db) * unit_hit(crack(low, high, dry_t60)[0]))
            add(spread, s, click * from_db(spread_db) * unit_hit(crack(low, high, click_t60)))
            rattle = unit_hit(crack(low, high, scatter_t60, grain_db=10.0))
            add(spread, s, force * from_db(scatter_db) * rattle)
        for hz, db, t60 in JAR:
            glass_db = np.interp(hz, pitches, levels) + db + rng.normal(0, glass_scatter_db)
            add(direct, s, from_db(glass_db) * ring(hz, t60))
    return (from_left(direct[0], corner_hz=5200) + spread) * from_db([[left_db], [-left_db]])


def scene(jar_wet_db=-11, fridge_wet_db=-8, snap_wet_db=-6):
    """Mix all sources; the jar, cream drops, blows, thuds and snaps also feed the kitchen echo."""
    jar = ice() + free_cubes() + bubbles() + knocks() + drops()
    fridge = fridge_blows() + thuds()
    snap = snaps()
    echo_feed = from_db(jar_wet_db) * jar + from_db(fridge_wet_db) * fridge + from_db(snap_wet_db) * snap
    room = kitchen(echo_feed)
    return jar + fridge + snap + room + shelf() + chatter() + pour() + rubbing() + air()


def record(dry, fall_hz=11000, level_hz=12700):
    """The microphone's treble steps down, the loudest peaks overload, then a steep low-pass follows."""
    fall = signal.butter(8, fall_hz, fs=SR)[1]
    level_off = signal.butter(8, level_hz, fs=SR)[1]
    heard = signal.lfilter(level_off / level_off.sum(), fall / fall.sum(), dry)
    clipped = heard / (1 + heard ** 8) ** (1 / 8)   # stays within -1 to 1
    return signal.sosfilt(signal.ellip(10, .1, 80, CUTOFF_HZ, fs=SR, output="sos"), clipped)


dry = scene()
out = record(dry)
materialize(out)
```